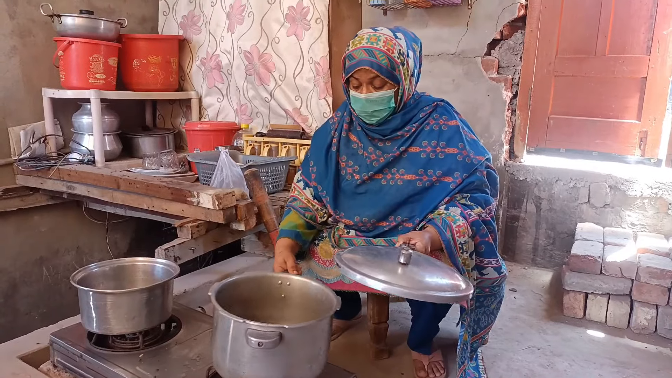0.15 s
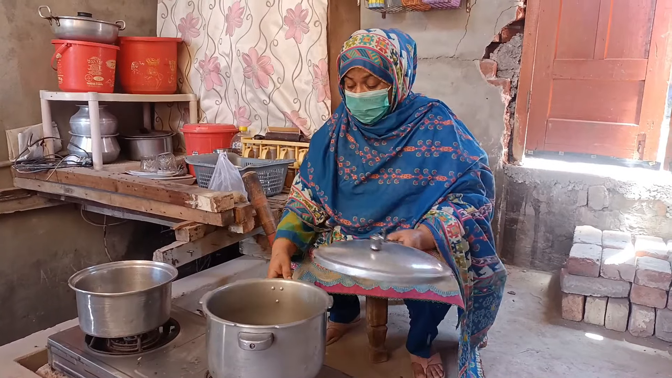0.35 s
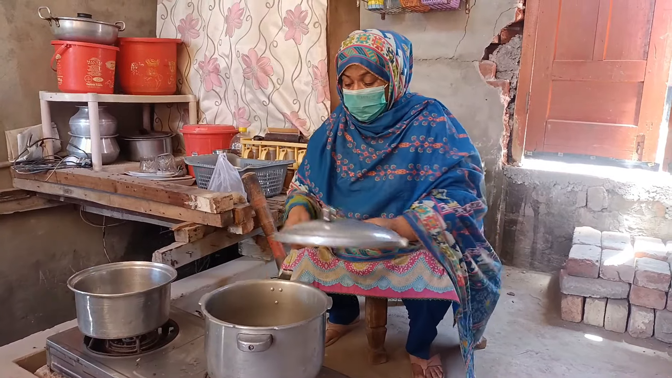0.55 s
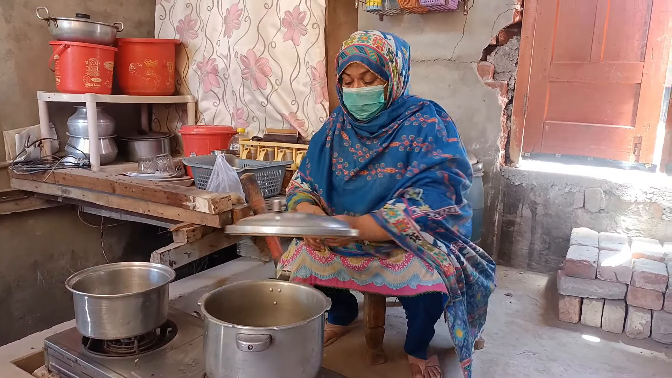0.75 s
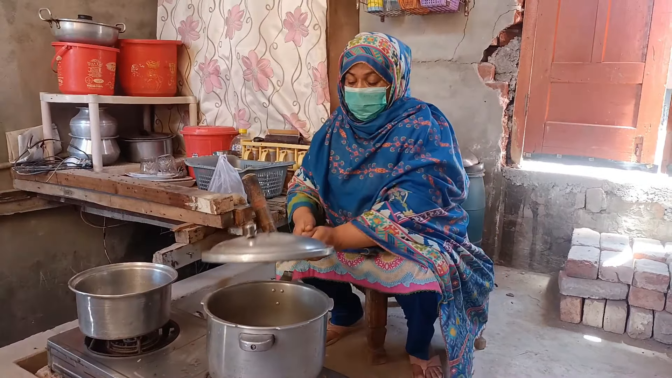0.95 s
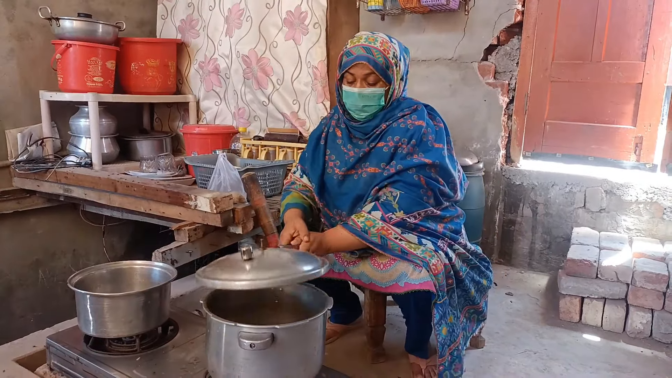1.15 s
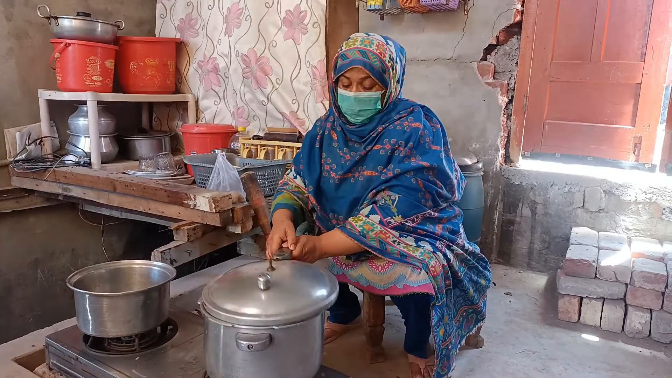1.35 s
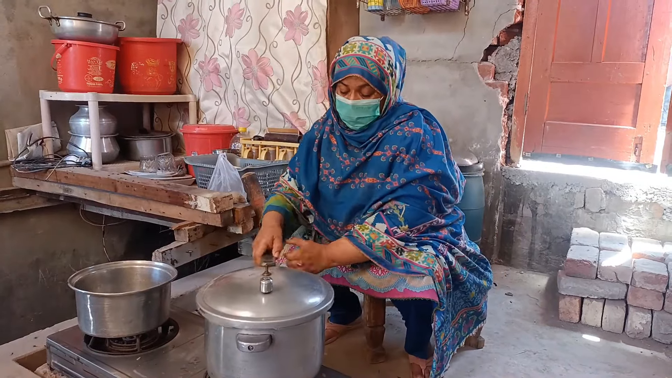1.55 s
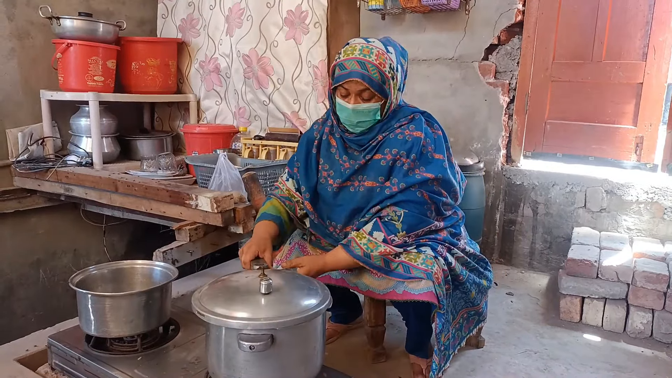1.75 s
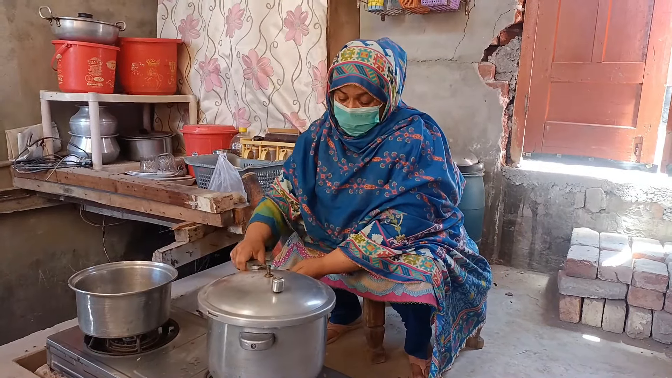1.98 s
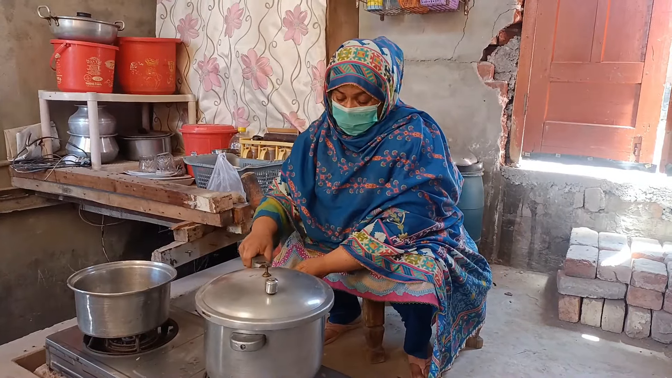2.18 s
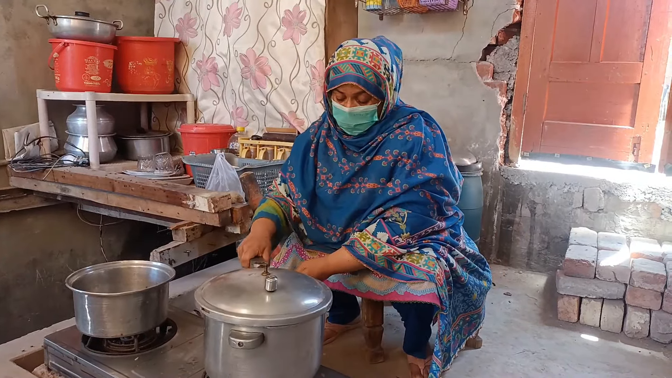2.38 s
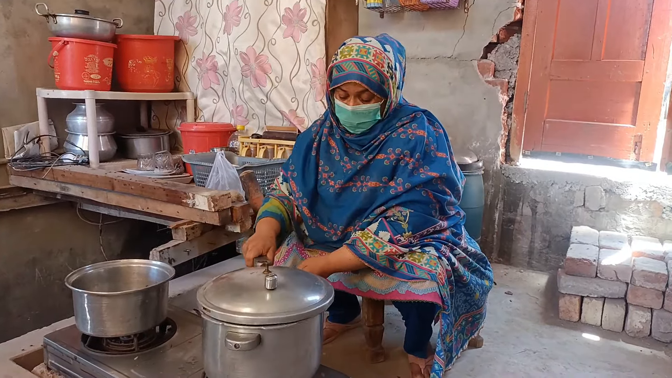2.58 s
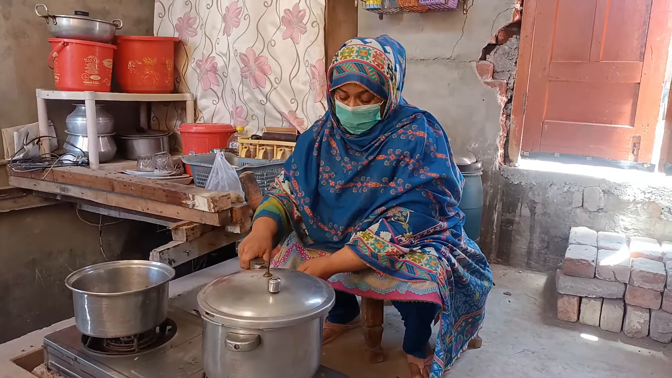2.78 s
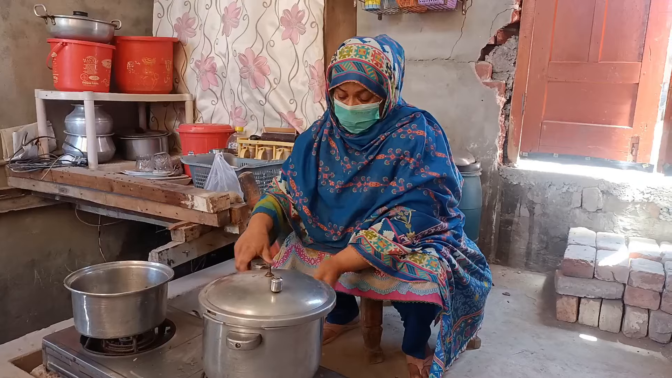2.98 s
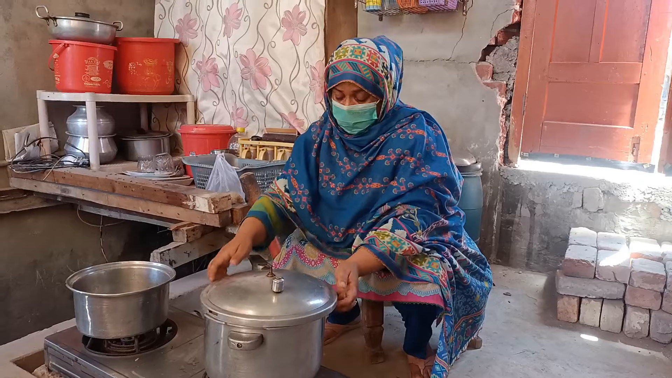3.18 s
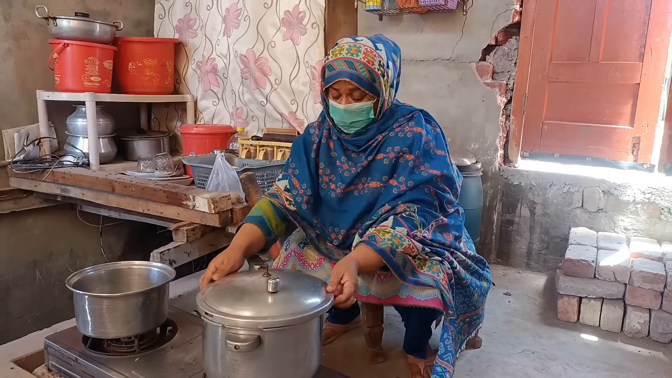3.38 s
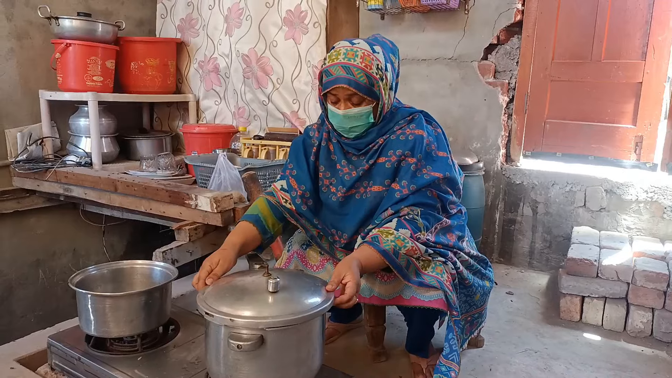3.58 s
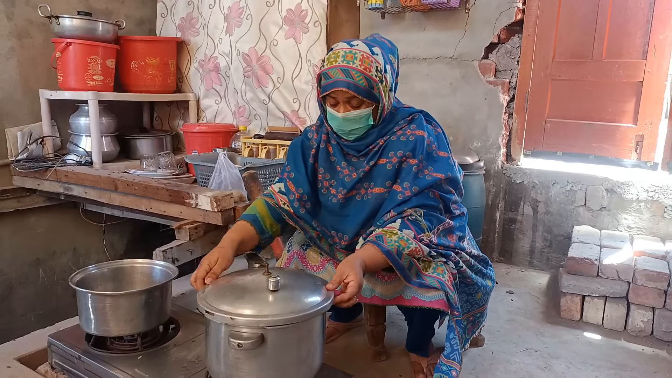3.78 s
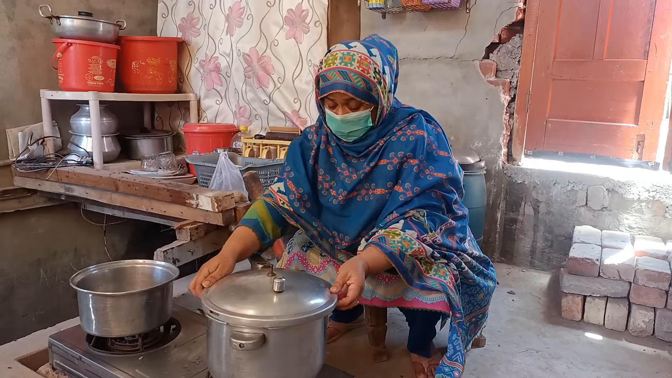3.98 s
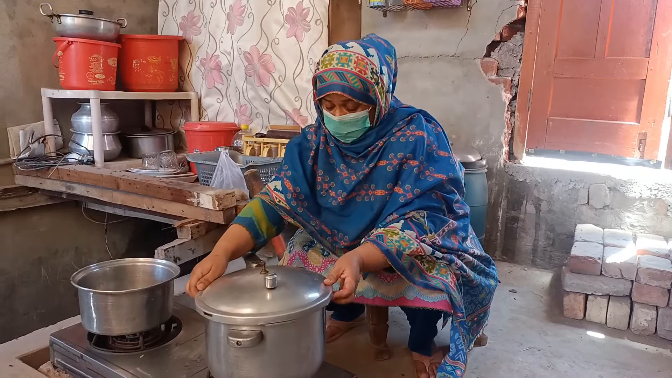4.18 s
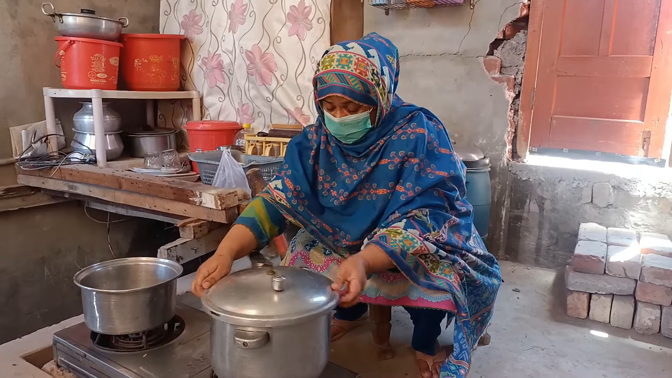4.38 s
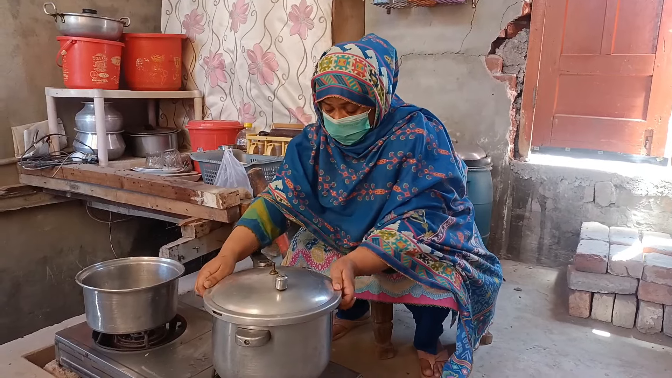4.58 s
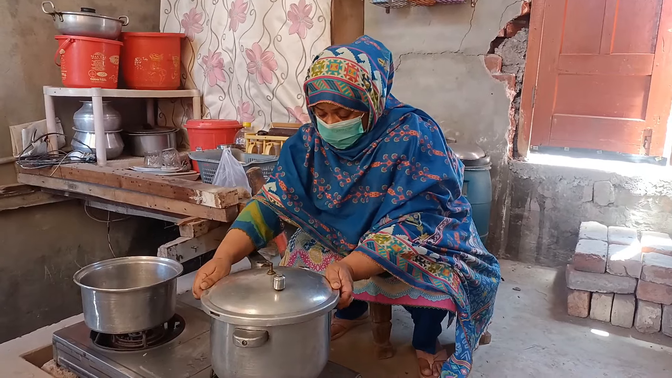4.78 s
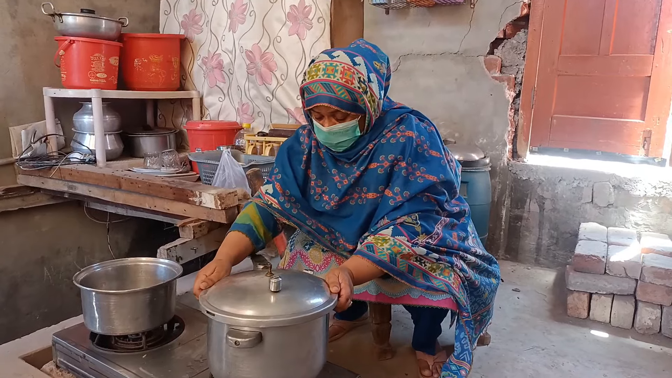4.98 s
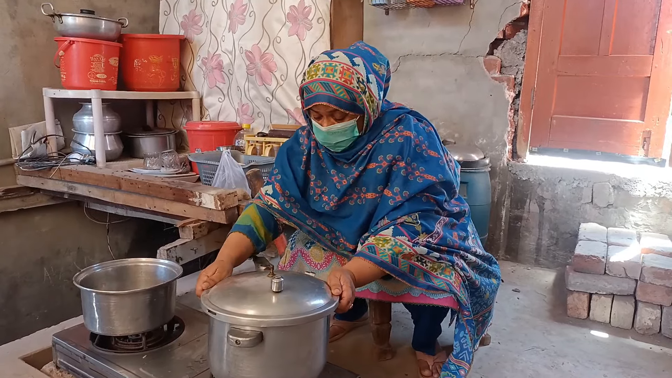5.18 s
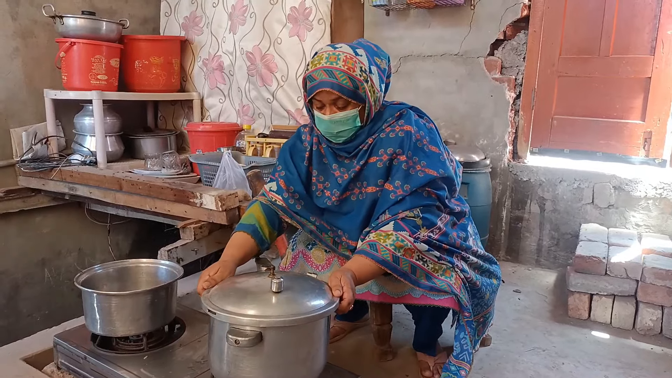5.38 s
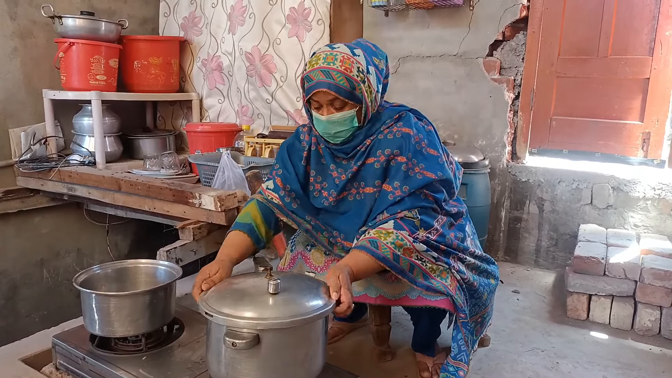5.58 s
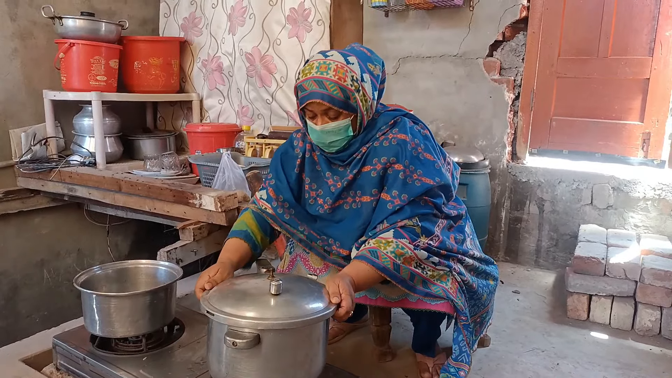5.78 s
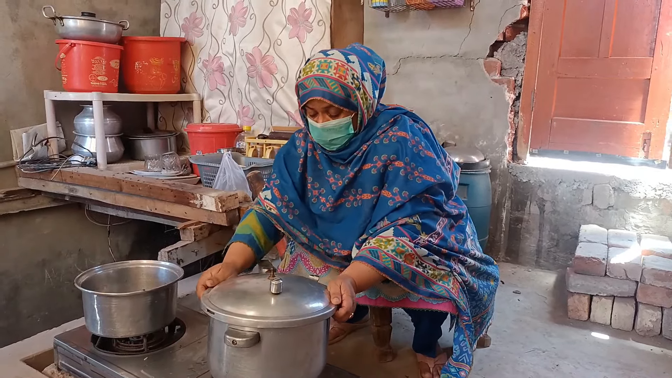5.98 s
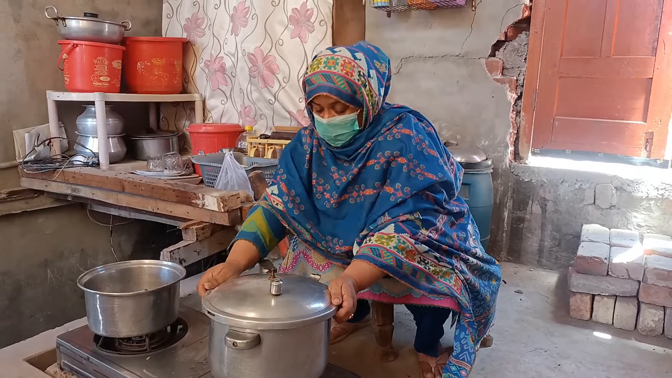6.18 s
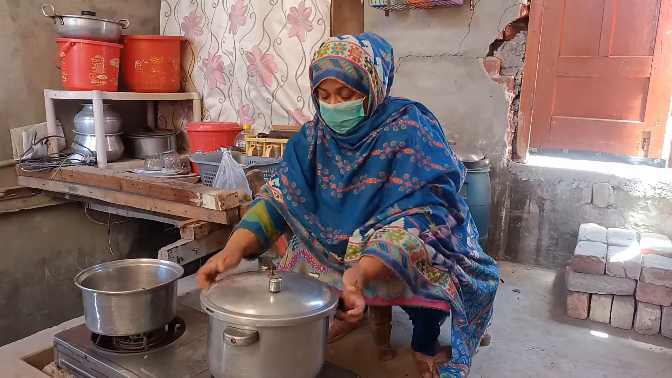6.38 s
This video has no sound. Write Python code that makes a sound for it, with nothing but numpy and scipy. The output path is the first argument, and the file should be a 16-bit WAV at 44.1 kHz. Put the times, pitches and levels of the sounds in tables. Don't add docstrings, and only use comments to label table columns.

```python
import sys
import numpy as np
from scipy import signal
from scipy.fft import rfft, irfft, next_fast_len
from scipy.io import wavfile
from scipy.ndimage import uniform_filter1d

SR = 44100
rng = np.random.default_rng(int(sys.argv[2]) if len(sys.argv) > 2 else 0)


def dump(signal):
    limited = np.clip(np.atleast_2d(signal).T, -1, 1)
    pcm = np.round(limited * 32767).astype(np.int16)
    wavfile.write(sys.argv[1], SR, pcm)


def level_to_linear(level):
    exponent = np.asarray(level, float) / 20
    return 10 ** exponent


N = 284224
TIME = np.arange(N) / SR


def rms_one(x):
    return x / np.sqrt(np.mean(x ** 2) + 1e-20)


def at_hz(points, hz):
    f, value = np.transpose(points)
    return np.interp(np.log(hz), np.log(f), value)


def coloured(x, spectrum):
    size = next_fast_len(x.shape[-1])
    gain = level_to_linear(at_hz(spectrum, np.fft.rfftfreq(size, 1 / SR) + 1))
    return irfft(rfft(x, size) * rms_one(gain), size)[..., :x.shape[-1]]


def highpass(x, hz):
    return signal.sosfilt(signal.butter(4, hz, "high", fs=SR, output="sos"), x)


def drift(rate):
    knots = rng.standard_normal(int(N / SR * 40) + 3)
    return np.interp(TIME * min(rate, 39), np.arange(len(knots)), knots)


def ring(clicks, hz, t60):
    r = level_to_linear(-60 / (max(t60, .002) * SR))
    w = 2 * np.pi * hz / SR
    return signal.lfilter([0, np.sin(w)], [1, -2 * r * np.cos(w), r * r], clicks + 1e-18)


def blows(times, db):
    clicks = np.zeros(N)
    clicks[(np.asarray(times) * SR).astype(int)] = level_to_linear(db)
    return clicks


def struck(times, db, modes, scatter_db):
    luck = scatter_db * rng.standard_normal((len(times), len(modes)))
    out = np.zeros(N)
    for k, (hz, level_db, t60) in enumerate(modes):
        out += (-1) ** k * ring(blows(times, db + level_db + luck[:, k]), hz, t60)
    return out


def contact(times, db, spectrum, t60):
    fade = signal.lfilter([1], [1, -level_to_linear(-60 / (t60 * SR))], blows(times, db))
    return fade * coloured(rng.standard_normal(N), spectrum)


def add(out, s, db, hz, t60, rise_s=1e-5):
    t = np.arange(SR // 4) / SR
    swing = level_to_linear(db - 60 * t / max(t60, .001)) * np.sin(2 * np.pi * hz * t) * (1 - np.exp(-t / rise_s))
    start = int(s * SR)
    out[start:start + len(t)] += swing[:N - start]


def swells(rows):
    out = np.zeros((2, N))
    for s, rise_s, *db in rows:
        age = np.clip((TIME - s) / max(rise_s, .004), 0, 30)
        out += level_to_linear(db)[:, None] ** 2 * (age * np.exp(1 - age)) ** 1.21
    return np.sqrt(out)


# [f/Hz, likeness 0-1]
LIKENESS = [(30, .99), (130, .98), (290, .91), (640, .72), (1400, .1), (15000, .1)]


def stereo_noise(size):
    alike = np.clip(at_hz(LIKENESS, np.fft.rfftfreq(size, 1 / SR) + 1), 0, 1)
    mid, side = rfft(rng.standard_normal((2, size)))
    return irfft(np.sqrt(.5 + alike / 2) * mid + np.sqrt(.5 - alike / 2) * side * [[1], [-1]], size)


# [t/s, level/dB of the mode families near 2.7, 5, 7.1 and 8.3 kHz]
HAMMER = [
    (0.2461, -22.5, -19.5, -27.5, -21),
    (1.194, -18.5, -18, -29.5, -13),
    (1.9768, -22, -23, -48, -8),
    (2.8468, -30, -21.5, -29, -7.5),
]
# [level/dB of top modes, level/dB of crack, lean to the left/dB]
BITE = [(13, 7, 0.5), (16, 8, 0), (15, 6, 3), (-6, 8.5, -0.5)]
# [family 0-3, f/Hz]
BAR_HZ = [(0, 2444), (0, 2625), (0, 2692), (0, 2730), (0, 2808), (0, 2866), (0, 2960), (1, 4727), (1, 4810),
          (1, 4940), (1, 5090), (1, 5118), (1, 5170), (2, 7085), (2, 7127), (3, 8289), (3, 8105), (3, 8197),
          (3, 8267)]
# [level/dB, t60/s]
BAR = [(-42, 0.2), (-25, 0.55), (4, 0.94), (2.5, 0.83), (3, 0.6), (-6, 0.56), (-12, 0.77), (-29, .25),
       (-5, 0.095), (7.5, 0.15), (6, 0.083), (15, 0.27), (-27, 0.22), (2, 0.19), (-12, 0.19), (-9, 0.57),
       (-11, 0.19), (-18, 0.25), (2, 0.25)]
CROWD_HZ = (2730, 4980, 7110, 8230)
# [level/dB, t60/s]
CROWD = [(6, 0.2), (5, 0.056), (13.5, 0.026), (-51, .02)]
# [f/Hz, level/dB, t60/s]
HIGH = [(9960, -26, .06), (10850, -17, .04), (11010, -19, .08), (11690, -15, .06), (11900, -19, .04),
        (13200, -26, .03), (13500, -27, .03)]
# [f/Hz, level/dB per Hz]
CRACK = [(600, -52), (1000, -70), (2050, -21), (2650, 23), (3500, -0.5), (4900, 9.5), (6200, 0.5),
         (8500, 1.5), (9300, -2), (10400, 12), (11300, 8.5), (13500, -8), (15500, -46)]
SLACK = (1, .55, .4, .22)
TOP_LATE_S = (0, .008, .007, .01)


def hammer():
    s, *family_db = np.transpose(HAMMER)
    top_db, crack_db, _ = np.transpose(BITE)
    out = contact(s, crack_db + 0.5, CRACK, t60=0.026)
    out += coloured(blows(s, crack_db + 15.5), CRACK)
    out += struck(s, top_db, HIGH, scatter_db=4.0)
    for db, hz, (level_db, t60) in zip(family_db, CROWD_HZ, CROWD):
        out += ring(blows(s, db + level_db + 8.5), hz, t60)
    twins = 7
    twin_spread, grip_detune = .0045, 0.007
    click, top = np.eye(1, SR * 3 // 4)[0], np.zeros(N)
    for when, late, slack, db in zip(s, TOP_LATE_S, SLACK, np.transpose(family_db)):
        for (family, hz), (level_db, t60) in zip(BAR_HZ, BAR):
            luck, shift = rng.standard_normal((2, twins))
            level = db[family] + level_db + 4 + 1.5 * luck
            t60 = min(t60, .42 if family else .7)
            if family == 3:
                start = int((when + late) * SR)
                top[start:start + len(click)] += ring(click * level_to_linear(level[0]), hz, t60)
                continue
            start = int(when * SR)
            pitches = hz * (1 + (twin_spread + (slack < 1) * grip_detune) * shift)
            decays = t60 * slack / (1 + shift ** 2)
            for twin_db, pitch, decay in zip(level - 10.3, pitches, decays):
                out[start:start + len(click)] += ring(click * level_to_linear(twin_db), pitch, decay)
    return out, top


def lean():
    latest = np.searchsorted(np.array(HAMMER)[1:, 0] - .01, TIME)
    return level_to_linear(np.array(BITE)[latest, -1] * [[.5], [-.5]])


# [t/s, contact level/dB, boom level/dB, wall mode level/dB, clang level/dB]
BOUNCES = [
    (1.3424, 4.5, -13, -18.5, -14),
    (1.3982, 1.5, -22, -55, -47),
    (1.43, 8, -11.5, -28, -25.5),
    (1.502, 2.5, -16.5, -26, -23),
    (1.5422, -5.5, -21, -29, -30),
    (1.8443, -11.5, -49, -29, -40),
    (2.5403, -14, -53, -30, -32.5),
    (2.6259, -10, -21, -25, -32.5),
]
# [f/Hz, level/dB, t60/s]
BOOM = [(148, -14, 0.31), (166.6, -6.5, .6), (242, -3, 0.2), (280, -1, 0.14)]
# [f/Hz, level/dB, t60/s]
BODY = [(377, -6, 0.59), (388.5, 2, 0.2), (455, 7.5, 0.19), (495, 3, 0.68), (575, 10.5, 0.08),
        (637.5, 3, 0.23), (740, 0, 0.072), (858, 3, 0.29), (965, 11, 0.048)]
# [f/Hz, level/dB, t60/s]
CLANG = [(1284, 0, .15), (1400, -8, .12), (2030, -7, .12), (2350, -3, .07), (2455, -2, .08), (2880, 4, .07),
         (3165, 1, .06), (3430, 0, .07), (3660, 4, .06), (4000, 7, .03), (4545, 4, .04), (5430, 1, .04)]
# [t/s, level/dB, f/Hz, t60/s]
STRUCK_NOTES = [(1.343, -38, 1330, 0.11), (1.3422, -15.5, 881, 0.14), (1.3422, -26, 700, 0.045),
                (1.3403, -9, 5880, .05), (1.43, -14, 5870, .05), (1.977, -7, 2310, .06),
                (1.977, -20, 2000, 0.044), (2.847, -14, 3300, .04), (2.847, -17, 4100, .04),
                (2.847, -18, 4520, .05), (1.43, -13, 3595, .05), (1.502, -20, 3670, .05),
                (2.847, -16, 2210, 0.055), (2.846, -26, 1500, 0.037), (2.848, -22, 1067, 0.064),
                (1.3422, -17, 4300, 0.033), (1.341, -2, 2830, 0.14), (1.429, 0.5, 2396, 0.074),
                (1.443, -10.5, 977, 0.04), (1.43, -11.5, 887, 0.1), (1.501, -7, 2354, .07),
                (1.542, -9, 2460, 0.054), (1.58, -20, 963, 0.037), (1.632, -28, 710, 0.032),
                (1.663, -21, 3990, 0.018), (1.8408, -21.5, 3200, 0.044), (1.8437, -30, 2410, .03),
                (1.8447, -18, 4300, 0.034), (1.8448, -14, 1180, 0.023), (2.5385, -25, 910, 0.32),
                (2.54, -30, 1850, 0.037), (2.6262, -20, 888, 0.16), (2.626, -23, 1790, 0.038)]
# [f/Hz, level/dB per Hz]
RIM = [(530, -4), (900, 0), (1410, 9.5), (1590, -37), (1970, 0.5), (2360, 12), (2920, 3.5), (12000, -15),
       (15400, -75)]


def pot():
    s, peak_db, boom_db, body_db, clang_db = np.transpose(BOUNCES)
    held_body = [(hz, db, min(t60, .22)) for hz, db, t60 in BODY]
    boom = struck(s, boom_db, BOOM, scatter_db=3)
    body = struck(s, body_db - 5.0, held_body, scatter_db=4.0)
    clang = struck(s, clang_db + 2, CLANG, scatter_db=3)
    for start, db, hz, t60 in STRUCK_NOTES:
        add(clang, start, db, hz, t60)
    return boom + body + clang + contact(s, peak_db + 1.0, RIM, t60=0.0065)


# [t/s, level/dB, f/Hz, contact level/dB]
KNOCKS = [(0.041, -20, 484, -67), (0.1, -24, 484, -65), (0.25, -9, 382, -39), (0.332, -17, 495, -28.5),
          (0.705, -21, 366, -43.5), (1.194, -15.5, 410, -49), (1.251, -6, 353, -51),
          (1.844, -18.5, 550, -36), (1.973, -13, 380, -30), (2.54, -49, 455, -32), (2.74, -23, 856, -34.5),
          (2.854, -15, 673, -47), (3.357, -46, 384, -34.5), (3.424, -33, 885, -29.5),
          (3.499, -26, 450, -51), (3.735, -23, 377, -41), (4.086, -33, 945, -30.5), (4.088, -25, 1195, -61),
          (4.174, -27, 460, -41.5), (4.463, -10.5, 528, -24.5), (4.499, -13, 462, -27),
          (4.973, -20, 565, -51), (5.059, -15, 716, -37), (5.21, -17, 489, -45), (5.239, -19.5, 672, -73),
          (5.32, -13, 648, -34), (5.575, -42, 557, -41), (5.917, -15, 700, -37), (6.019, -14, 680, -37),
          (6.078, -17, 436, -51), (6.259, -21, 577, -31)]
# [t/s, level/dB, f/Hz, contact level/dB]
MORE_KNOCKS = [
    (0.862, -32, 720, -39.5),
    (3.883, -33, 636, -37.5),
    (4.705, -26, 430, -37.5),
    (5.835, -26, 580, -39.5),
    (5.97, -14, 420, -53),
    (6.385, -21, 577, -40.5),
]
# [t/s, level/dB, f/Hz]
BOOMS = [(0.33, -26, 244), (1.195, -25, 237), (1.252, -14, 344), (1.844, -33, 210), (1.973, -14, 176),
         (2.078, -17, 167.4), (2.33, -29.5, 170), (2.537, -21, 210), (2.759, -25, 165), (2.855, -14, 171.5),
         (2.949, -16.5, 163), (3.426, -40, 215), (4.085, -31, 252), (4.17, -27.5, 140), (4.463, -19.5, 247),
         (4.502, -24, 245), (4.702, -55, 167), (5.056, -27.5, 245), (5.211, -36, 248), (5.212, -23, 95),
         (5.32, -26, 241), (5.575, -34, 250), (5.918, -30, 241), (5.969, -24.5, 118), (6.261, -29.5, 234)]
# [f/Hz, level/dB per Hz]
THUD = [(150, -4), (250, 1), (353, -19), (545, 4), (1400, -10.5), (2670, -28), (4320, -14), (9000, -29),
        (11700, -73), (19800, -120)]


def knocks():
    out = np.zeros(N)
    rise_s = 0.001
    for s, peak_db, hz, _ in KNOCKS + MORE_KNOCKS:
        add(out, s, peak_db + 7.0, hz, 0.038, rise_s)
        add(out, s, peak_db - 21, hz * 1.1, 0.026, rise_s)
        add(out, s, peak_db - 3.5, hz * 0.715, 0.049, rise_s)
        add(out, s, peak_db - 6, hz * 1.223, 0.027, rise_s)
    for s, boom_db, hz in BOOMS:
        add(out, s, boom_db + 7.5, hz, t60=.13)
    times, _, _, contact_db = np.transpose(KNOCKS + MORE_KNOCKS)
    return out + contact(times, contact_db + 19, THUD, t60=0.02)


# [t/s, level/dB, f/Hz]
TICKS = [(0.047, -31.5, 4170), (0.093, -33.5, 2510), (0.658, -42, 4220), (0.777, -44, 4560),
         (1.1303, -28, 6100), (1.7682, -36.5, 2370), (2.227, -35, 4600), (2.788, -34.5, 4620),
         (3.4229, -30, 4500), (3.797, -38, 5600), (3.882, -35.5, 3480), (4.112, -34, 4400),
         (4.1734, -32, 5550), (3.65, -36, 4700), (4.01, -38, 4670), (4.265, -35.5, 4640),
         (4.303, -39, 5560), (4.876, -32.5, 6100), (5.0797, -37, 6660), (5.2457, -30.5, 6300),
         (5.4132, -40, 4600), (5.7605, -40, 7700), (5.855, -34.5, 7600), (5.977, -35.5, 4550),
         (6.1172, -18, 2280), (6.412, -34, 6200)]
# [t/s, level/dB, f/Hz, t60/s]
CHINKS = [(1.3425, -16, 3730, 0.035), (2.543, -43, 2950, 0.12), (2.541, -37, 3700, .04),
          (2.541, -35.5, 2040, .05), (3.3547, -43.5, 3320, 0.027), (3.426, -27.5, 4280, 0.07),
          (3.6, -40, 4130, 0.037), (3.954, -46, 4400, .03), (4.088, -36.5, 4200, .03),
          (4.3664, -38, 6400, .02), (4.4353, -47, 4300, .02), (4.452, -33.5, 4470, .03),
          (4.545, -29, 4120, 0.065), (4.772, -30.5, 4370, 0.089), (4.7705, -44, 2320, 0.088),
          (4.969, -33, 6200, 0.018), (5.053, -42, 4800, 0.022), (5.3976, -44, 5950, .02),
          (5.478, -38, 4660, 0.033), (5.645, -38, 6040, 0.015), (5.7882, -39, 4540, 0.075),
          (5.7887, -37, 2270, 0.035), (6.075, -42, 2340, .04), (6.105, -30.5, 2330, 0.15),
          (6.1163, -32, 3580, .03), (6.24, -37, 5920, .06)]


def ticks():
    out = np.zeros(N)
    for s, peak_db, hz in TICKS:
        add(out, s, peak_db + 15, hz, t60=0.014)
    for (s, db, hz, t60), shifts in zip(CHINKS, rng.uniform(-1.13, 1, (len(CHINKS), 5))):
        for shift in shifts:
            add(out, s, db + 4, hz * (1 + 0.0405 * shift), t60)
    return out


# [t/s, time to full pressure/s, grit level/dB, swish level/dB]
SCRAPES = [
    (0.86, 0.057, -48, -33.5),
    (1.09, 0.025, -39, -33.5),
    (1.342, 0.038, -24, -29),
    (2.56, 0.014, -31, -52),
    (4.465, 0.005, -32, -21),
    (4.52, 0.018, -31.5, -25),
    (4.76, 0.036, -50, -34.5),
    (6.08, 0.032, -30, -63),
    (6.2, 0.016, -42, -59),
    (6.37, 0.087, -36, -39),
]
# [f/Hz, level/dB per Hz]
SCRAPE = [(590, -81), (1000, 2), (1940, 3.5), (2310, 10.5), (3440, 2), (4630, 5), (5320, -4), (13100, -31),
          (15400, -52)]


def scrapes():
    heights = level_to_linear(0.39 * np.minimum(rng.exponential(1, N), 5))
    grit = heights * rng.choice([-1, 1], N) * (rng.random(N) < 2500 / SR)
    stroke, bright = swells(SCRAPES)
    swish = highpass(rng.standard_normal((2, N)), 7500)
    return 1.3 * stroke * rms_one(coloured(grit, SCRAPE)), 1.07 * bright * swish


# [t/s, length/s, level/dB, f/Hz]
SING = [
    (3.6, .17, -44, 2650),
    (6.005, .27, -41, 1300),
    (6.085, .165, -27.5, 4720),
    (6.085, .15, -35, 7110),
]


def ring_song():
    out, edge_s = 0, .015
    for s, length, db, hz in SING:
        gate = np.clip(np.minimum(TIME - s, s + length - TIME) / edge_s, 0, 1)
        beat = 1 + .75 * np.cos(2 * np.pi * 7.2 * (TIME - s - 2 * edge_s))
        fade = level_to_linear(db - 60 * np.clip(TIME - s, 0, 1))
        out = out + gate * beat * fade * np.sin(2 * np.pi * hz * TIME)
    return out


# [t/s, level/dB]
GROUND = [(0, -38), (.3, -33), (.56, -45), (.8, -38), (1.2, -37), (1.8, -36.5), (2.4, -34.5), (3.2, -35),
          (4.2, -34), (4.8, -36.5), (6.44, -37)]
# [t/s, time to full/s, rumble level/dB, hiss level/dB]
SHAKES = [(0.03, 0.03, -59, -33.5), (.25, 0.067, -29.5, -47), (1.342, 0.014, -21.5, -8.5),
          (1.4, 0.07, -25, -32), (1.97, 0.03, -21.5, -18.5), (2.3, 0.17, -35.5, -64),
          (2.85, 0.03, -22, -32), (3.42, 0.055, -33.5, -60), (4.52, 0.093, -35.5, -58),
          (4.9, 0.29, -34, -36), (5.95, 0.068, -28, -36.5)]
# [f/Hz, level/dB per Hz]
RUMBLE = [(15, -30), (28, -17), (50, -4.5), (85, -7), (176, 2), (205, -2), (371, -1.5), (398, -4.5),
          (535, -5), (636, -4.5), (826, -15), (1600, -23), (2080, -27), (3520, -120)]
# [f/Hz, level/dB per Hz]
HISS = [(590, -43), (1000, -21), (1100, -14), (1380, -6), (1620, -17.5), (2280, 3.5), (3250, -2), (4040, 0),
        (5140, -1), (6310, -1), (7000, -7), (7760, -5), (8400, -5.5), (11800, -2.5), (15400, -0.5)]


def background():
    flame = level_to_linear(np.interp(TIME, *np.transpose(GROUND)))
    low_shake, high_shake = swells(SHAKES)
    size = next_fast_len(N)
    rumble_level = np.hypot(flame * level_to_linear(-4.5), low_shake) * level_to_linear(2.6 * drift(18))
    rumble = rumble_level * coloured(stereo_noise(size), RUMBLE)[:, :N]
    hiss_level = np.hypot(flame, high_shake) * level_to_linear(1.3 * drift(25))
    hiss = hiss_level * coloured(stereo_noise(size), HISS)[:, :N]
    born = rng.random((7, N)) * (rng.random((7, N)) < 30 / SR)
    pitches_hz = (3000, 3700, 4250, 4750, 5500, 6200, 6500)
    sputter = sum(ring(b, hz, .008) for b, hz in zip(born, pitches_hz)) * flame * level_to_linear(6)
    hum = level_to_linear(-46 + 3.5 * drift(20)) * np.sin(2 * np.pi * 50 * TIME)
    return rumble + hiss + sputter * [[1], [-.7]] + hum


# [f/Hz, t60/s]
WALLS = [(100, 0.39), (400, 0.51), (2000, 0.43), (5000, 0.4), (10000, 0.37), (15000, 0.31)]


def room(x, direct_db, rise_s, liveliness):
    t, noise, tail = np.arange(SR // 2) / SR, stereo_noise(SR // 2), 0
    edges = 40 * 2 ** np.arange(0, 9.1, 1)
    for low, high in zip(edges, edges[1:]):
        band = signal.sosfilt(signal.butter(2, [low, high], "band", fs=SR, output="sos"), noise)
        t60 = liveliness * at_hz(WALLS, np.sqrt(low * high))
        tail = tail + band * level_to_linear(-60 * t / t60)
    tail = tail * (1 - np.exp(-t / rise_s))
    tail = tail / np.sqrt(np.sum(tail ** 2) / 2)
    tail[:, 0] += level_to_linear(direct_db)
    return signal.fftconvolve(x[None], tail, axes=1)[:, :N]


def scene():
    grit, swish = scrapes()
    song = ring_song() + swish
    bar, top = hammer()
    bar_room = room(bar, direct_db=-24, rise_s=0.004, liveliness=1.0)
    top_room = room(top, direct_db=-4.5, rise_s=0.0024, liveliness=0.6)
    steel = lean() * level_to_linear(-1.0) * (bar_room + level_to_linear(-1.0) * top_room)
    lid = room(pot() + 0.88 * grit, direct_db=-7.5, rise_s=0.00081, liveliness=0.92)
    hands = room(knocks(), direct_db=-9.0, rise_s=0.0027, liveliness=0.82)
    hands = hands + .7 * room(ticks(), direct_db=0, rise_s=0.001, liveliness=0.4)
    hits = highpass(steel + lid + hands, 105)
    return hits + (grit * .5 + song) * level_to_linear([[.5], [-.5]]) + background()


def masked(x, under_db):
    size = next_fast_len(N)
    spectrum, hz = rfft(x, size), np.fft.rfftfreq(size, 1 / SR)
    ring_band = irfft(spectrum * ((hz > 8000) & (hz < 8500)), size)[:, :N]
    weak = irfft(spectrum * ((hz > 9150) & (hz < 10700)), size)[:, :N]
    ring_power = uniform_filter1d(ring_band ** 2, size=2048)
    hidden = uniform_filter1d(weak ** 2, size=2048) < level_to_linear(2 * under_db) * ring_power
    hidden = hidden * np.roll(hidden, int(.045 * SR), axis=1)
    return x - weak * uniform_filter1d(hidden * 1., size=600)


# [f/Hz, level/dB]
PORT = [(20, -8.5), (8700, 3.5), (9700, -5), (10500, -4), (11000, -3.5), (20000, -12)]


def microphones(dry):
    size = next_fast_len(N)
    hz = np.fft.rfftfreq(size, 1 / SR) + 1
    left_lag_s = .000465 * np.array([[1], [0]])
    lag = np.exp(-2j * np.pi * np.maximum(hz - 850, 0) * left_lag_s)
    heard = irfft(rfft(dry, size) * level_to_linear(at_hz(PORT, hz)) * lag, size)[:, :N]
    return np.clip(heard, -.99, .99)


def top_cut(x):
    return signal.sosfilt(signal.butter(12, 15560, fs=SR, output="sos"), x)


def record(dry):
    mix = masked(microphones(dry), under_db=-8)
    return top_cut(mix)


dry = scene()
out = record(dry)
dump(out)
```